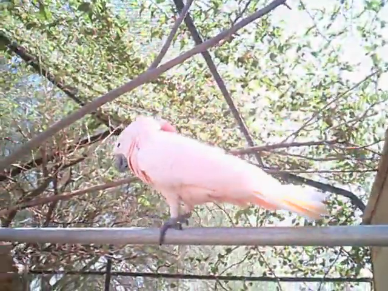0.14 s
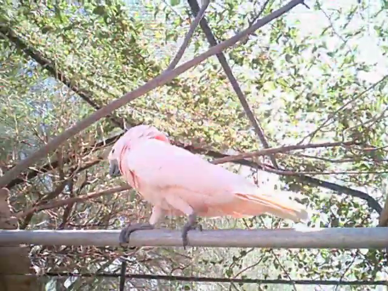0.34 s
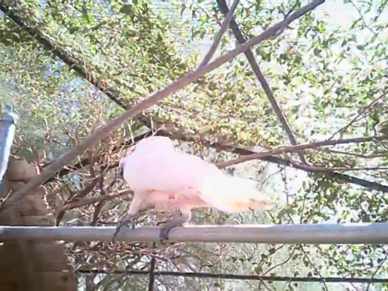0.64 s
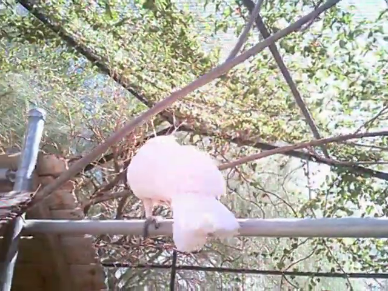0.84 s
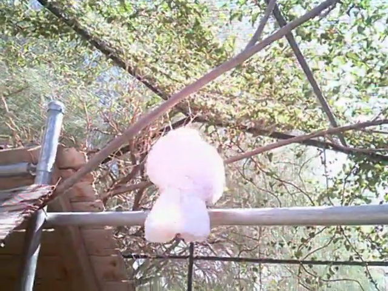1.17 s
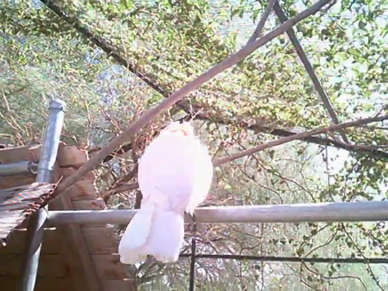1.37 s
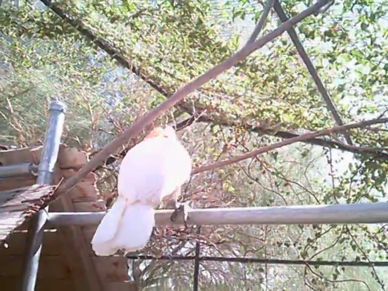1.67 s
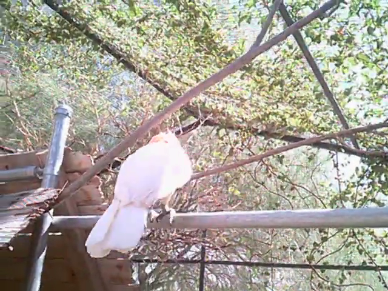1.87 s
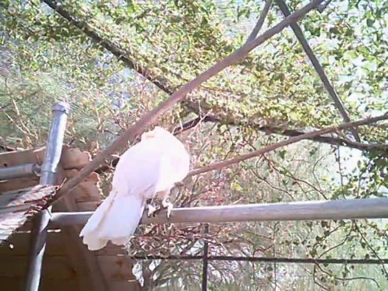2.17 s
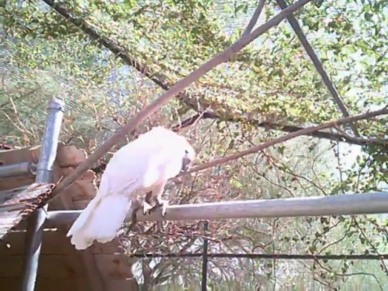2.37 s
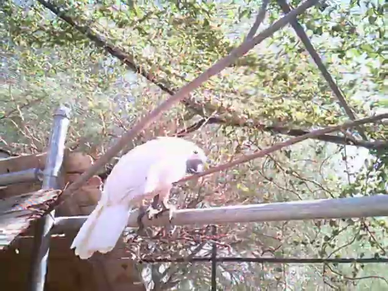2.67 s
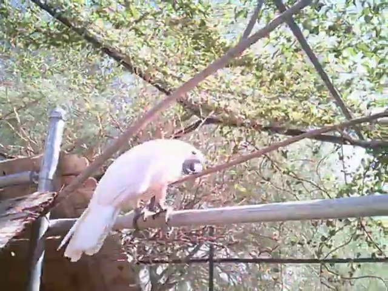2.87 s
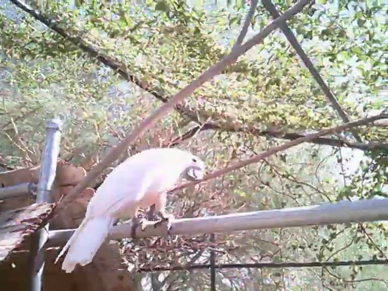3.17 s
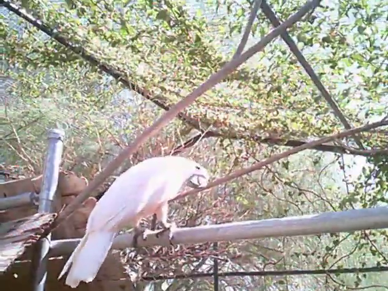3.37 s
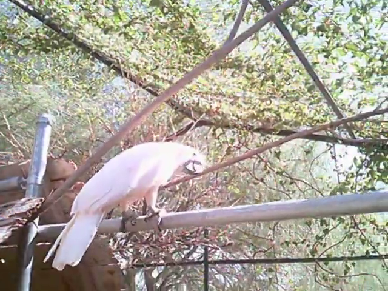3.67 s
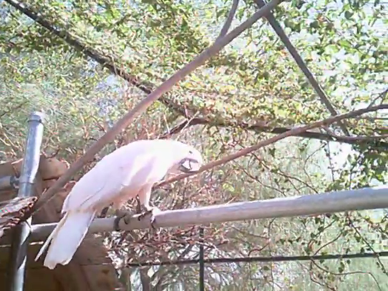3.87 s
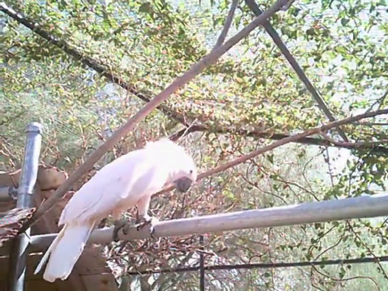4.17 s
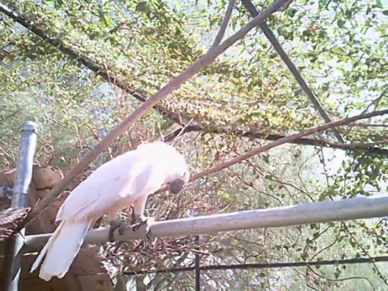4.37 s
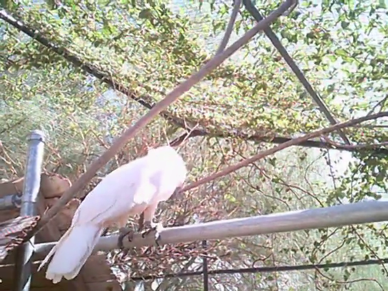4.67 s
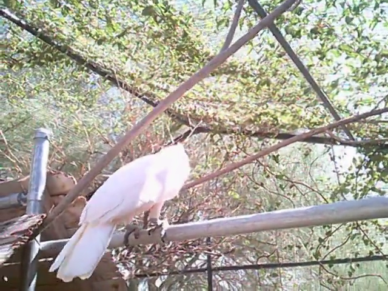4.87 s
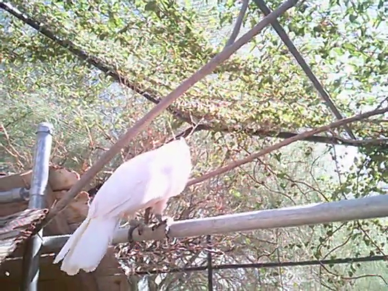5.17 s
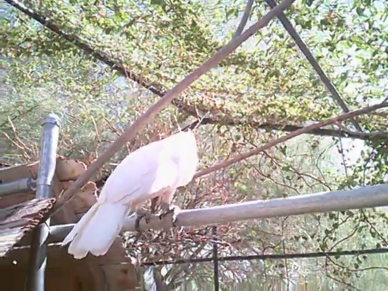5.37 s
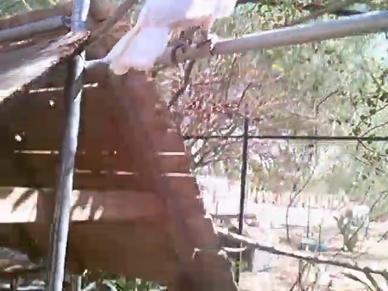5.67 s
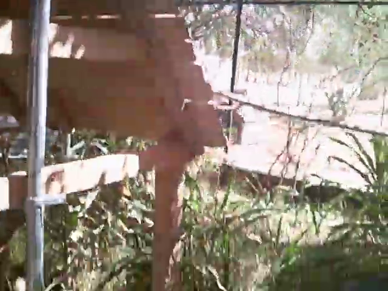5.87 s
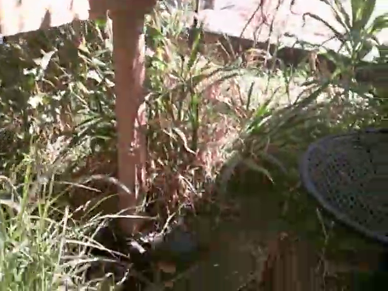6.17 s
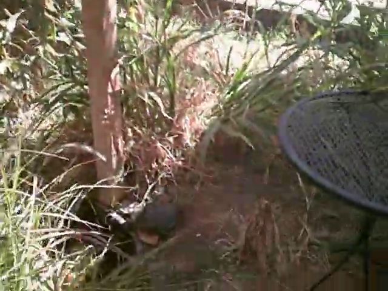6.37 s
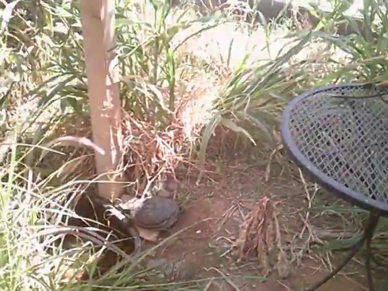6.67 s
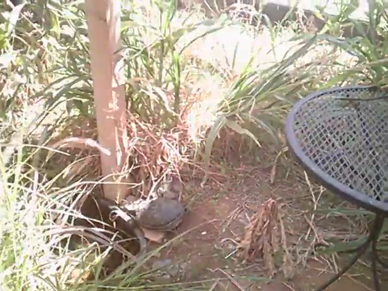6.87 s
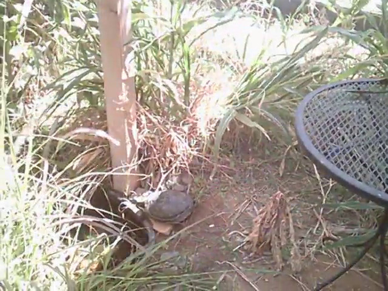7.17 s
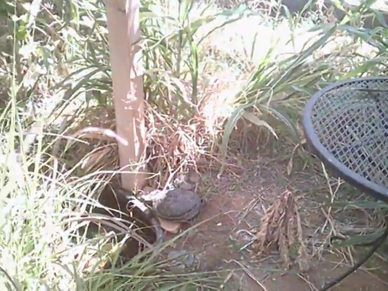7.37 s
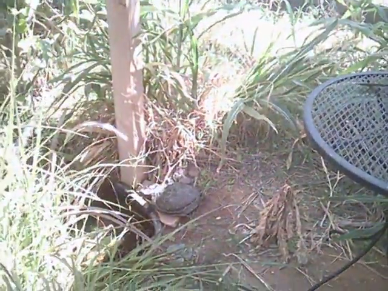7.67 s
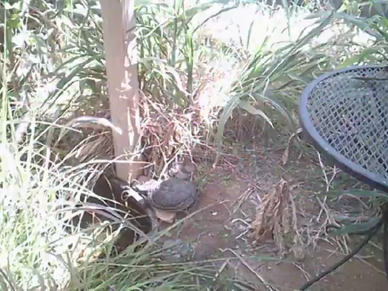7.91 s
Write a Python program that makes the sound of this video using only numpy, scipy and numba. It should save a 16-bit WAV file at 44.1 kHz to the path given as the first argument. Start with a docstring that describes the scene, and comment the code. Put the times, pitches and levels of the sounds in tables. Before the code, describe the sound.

Loud raspy parrot grumbles, about a third of a second each, repeat with pauses in open air; an eighth is cut off just as it starts.

```python
"""Cockatoo grumbling in an aviary

A cockatoo on a perch outdoors gives seven harsh, grumbling calls and starts an eighth. Each scoops
up to a held pitch, flips between rasping and clean vibration, and drops into a short croak: a voice
made of overtones and noise, coloured by throat and beak. A distant motor hums on sine waves. Filtered
noise makes open air, rustling leaves and ticking twigs; short sine waves make faint bird peeps and a knock.
"""
import sys
import numpy as np
from scipy import signal
from scipy.fft import rfft, irfft, next_fast_len
from scipy.io import wavfile
from scipy.ndimage import uniform_filter1d
from numba import njit

SR = 44100
rng = np.random.default_rng(int(sys.argv[2]) if len(sys.argv) > 2 else 0)


def unload_wav(signal):
    """Save mono or channel-first audio to the path in sys.argv[1] as 16-bit WAV at rate SR, clipped to [-1, 1]."""
    wavfile.write(
        sys.argv[1],
        SR,
        np.round(np.clip(np.atleast_2d(signal).T, -1, 1) * 32767).astype(np.int16),
    )


N = 354563
TIME = np.arange(N) / SR

# open air, the balance of its noise: f/Hz, relative level/dB
AIR_BALANCE = [(12, -29.5), (24, -2), (50, -1.5), (85, -8.5), (130, -14), (290, -20.5), (520, -25),
               (820, -21), (1300, -38), (2000, -41), (3200, -34.5), (4300, -56.5), (7000, -47.5),
               (9000, -61)]
# motor, its hum lines: f/Hz, relative level/dB
HUM_LINES = [(58.5, 1.5), (117, -13.5), (175.5, -16.5)]
# motor, loudness over time, before a common trim: t/s, level/dB
HUM_LOUDNESS = [(0, -46.5), (0.5, -37.5), (0.85, -46.5), (1.5, -40.5), (2.1, -40.5), (3.0, -45.5),
                (3.25, -35.5), (3.6, -50.5), (4.4, -43.5), (6.2, -46.5), (6.9, -42.5), (8.04, -44)]
# twig ticks, levels before a common trim and the echo: t/s, peak level/dB, ring f/Hz
TWIG_TICKS = [(0.288, -45.5, 1740), (1.0795, -45, 3200), (3.3617, -50, 3240), (3.497, -44.5, 2390),
              (6.4402, -46, 2000), (7.053, -47, 1890), (7.258, -48, 2700), (7.807, -43, 2190)]
# the calls: start t/s, end t/s, attack t/s, held pitch f/Hz, roughness (0 to 1), opening note level/dB,
# beak resonance f/Hz, then the basic level/dB of the lowest, second, third, upper and treble regions
CALLS = [ (.369, 0.824, 0.039, 422, 0.58, -30, 3050, -26.5, -26.5, -18, -20, -33),
         (1.135, 1.529, 0.028, 409.1, 0.7, -29, 2990, -30, -24.5, -21, -23.5, -38),
         (1.945, 2.309, 0.053, 414, 0.65, -38, 2960, -27.5, -24.5, -20.5, -23.5, -35),
         (2.73, 3.072, 0.038, 419, 0.62, -41, 2750, -23.5, -22, -19.5, -17.5, -29.5),
         (4.372, 4.768, 0.045, 407.1, .8, -28.5, 3050, -26, -27, -21, -19.5, -35.5),
         (5.12, 5.468, 0.044, 401.8, .68, -26.5, 2960, -24.5, -25.5, -21.3, -22.5, -38),
         (5.822, 6.137, 0.039, 398.9, .68, -29.5, 2700, -25, -25.5, -21, -17.5, -35.5),
         (8.017, 8.35, .045, 415.6, 0.8, -28.5, 3030, -24, -16.5, -20.5, -14, -32)]
# stretches where the membranes lock and the tone clears:
# start t/s, end t/s, roughness (0 to 1), ring level/dB, dip of the third region level/dB
CLEAR_STRETCHES = [(0.608, 0.666, .42, 4, 0.5), (1.188, 1.336, .5, 5.5, 6.5), (1.335, 1.386, .15, 5.5, 11),
                   (2.182, 2.26, .1, 0, 0), (2.949, 2.989, 0.39, 2.5, -1), (4.621, 4.677, .06, 3.5, 0.5),
                   (5.267, 5.338, .52, 2, 0.5), (5.991, 6.018, .45, 4, -1.5)]
# surges of pressure in the calls: t/s, half length t/s, pitch rise f/Hz, gain of the third region level/dB
PRESSURE_SURGES = [(0.499, .055, 18, 5.5), (0.712, .04, 14, 2), (1.427, .04, 22, 3), (2.091, .055, 28, 4.5),
                   (2.924, 0.0203, 14.15, -0.5), (4.492, .035, 16, 4.5), (4.584, .025, 18, 2.5),
                   (4.701, .016, 28, -0.5), (5.23, 0.01816, 11.985, 3.5), (5.353, .028, 21, 3),
                   (5.943, 0.01753, 16, -1), (6.046, .018, 27, -6.5)]
# throat resonances: f/Hz, width f/Hz, level/dB
THROAT_RESONANCES = [(878, 210, 6), (1290, 260, 5.5), (1520, 330, -3), (2076, 150, 2), (2340, 420, 1),
                     (2850, 1000, -7.5), (3202, 330, -3), (4490, 380, -17), (5324, 390, -22.5),
                     (6820, 1050, -19.5)]
# borders between the five regions of the throat: f/Hz
REGION_BORDERS = [1030, 1650, 2350, 4000]
# how each region answers the effort: attack depth level/dB, jump at the join level/dB, swell (dB per s),
# push level/dB, release (dB per s), share of a clear stretch's ring (ratio)
REGION_EFFORT = [(3, 1, 5, 7.5, 199, -0.61), (20.1, 2.5, 9.5, 2.5, 123, 1.0), (30, 3, -3, 3.9, 319, 0.1),
                 (41.4, 0.5, 11, 2, 359, -0.16), (41, 1.5, -1, 0.4, 420, 0.25)]
# peeps of birds farther off, before the echo: t/s, f/Hz, peak level/dB
FAR_PEEPS = [(1.81, 1490, -50), (5.078, 3320, -53), (6.59, 1440, -44.5), (6.787, 2450, -48.5),
             (7.513, 1415, -46), (7.679, 2360, -56), (7.865, 2210, -48)]
# one soft knock: t/s, f/Hz, starting level/dB
SOFT_KNOCK = (7.878, 560, -29)

# the scoop and the fall, depths as shares of the pitch
SCOOP_DEPTH, SCOOP_S = 0.43, 0.031
FALL_DEPTH, FALL_S, FALL_CURVE, FALL_ROUGHNESS = 0.61, 0.072, 1.6, 0.9
# the falling voice breaks up this long before the end, over this time
BREAK_LEAD_S, BREAK_S = 0.057, 0.016
LOCK_EDGE_S = 0.012
# the opening note peaks and fades, then the lower membrane joins and the voice jumps in level
NOTE_PEAK_S, NOTE_WIDTH_S, NOTE_DIP_DB = 0.015, 0.0092, 7
JOIN_S, JOIN_RAMP_S = 0.061, 0.0077
# a last push of air comes shortly before the end, and the sound dies from there
PUSH_LEAD_S, PUSH_WIDTH_S = 0.036, 0.015
# a surge roughens the voice and lifts the lower tone onto the lowest resonance
SURGE_ROUGHNESS_PER_HZ, SURGE_DB_PER_HZ = 0.0032, 0.1277


def from_db(db):
    """Turn decibels into a gain."""
    return 10 ** (np.asarray(db) / 20)


def rms_one(x):
    """Scale a sound to an average power of 1."""
    return x / np.sqrt(np.mean(x ** 2) + 1e-20)


def ramp(x):
    """Limit a value to the range from 0 to 1."""
    return np.clip(x, 0, 1)


def hump(t, width_s):
    """A bell of height 1 around time zero."""
    return np.exp(-np.minimum((t / width_s) ** 2, 50))


def butter(x, hz, kind, order=2):
    """A smooth filter that passes one side of a frequency."""
    return signal.sosfilt(signal.butter(order, hz, kind, fs=SR, output="sos"), x)


def drift(rate_hz, size=16):
    """Random wander, mostly slower than the given rate, with a spread of 1."""
    count = next_fast_len(N // size + 2)   # points on a coarse time grid
    hz = np.arange(count // 2 + 1) * SR / size / count
    spectrum = rfft(rng.standard_normal(count)) / (1 + (hz / rate_hz) ** 2)
    slow = irfft(spectrum, count)
    return np.interp(TIME, np.arange(count) * size / SR, rms_one(slow))


def resonate(x, hz, width_hz):
    """A simple resonance: it passes its own pitch at gain 1 and weakens the rest."""
    r = np.exp(-np.pi * width_hz / SR)
    forward = np.array([1, 0, -1]) * (1 - r * r) / 2
    feedback = [1, -2 * r * np.cos(2 * np.pi * hz / SR), r * r]
    return signal.lfilter(forward, feedback, x + 1e-18)


def shaped(x, gain_at):
    """Filter by a gain that depends on frequency."""
    size = next_fast_len(N + SR // 4)
    hz = np.maximum(np.arange(size // 2 + 1) * SR / size, 1)
    return irfft(rfft(x, size) * gain_at(hz), size)[:N]


def even(x, size):
    """Hold the running power at 1 over about this many samples."""
    power = uniform_filter1d(uniform_filter1d(x ** 2, size), size)
    return x / np.sqrt(np.abs(power) + 1e-12)


@njit
def glide(x, angle, r):
    """A resonance whose centre (radians per sample) moves; gain 1 at the centre."""
    y = np.zeros(len(x))
    for i in range(2, len(x)):
        fresh = (1 - r * r) / 2 * (x[i] - x[i - 2])
        y[i] = fresh + 2 * r * np.cos(angle[i]) * y[i - 1] - r * r * y[i - 2]
    return y


def moving_resonance(x, centre_hz, width_hz):
    """The gliding resonance applied twice, for steep sides."""
    angle = 2 * np.pi * centre_hz / SR
    r = np.exp(-np.pi * width_hz / SR)
    return glide(glide(x + 1e-18, angle, r), angle, r)


def air(level_db=-42.5, sway_db=1.9):
    """Soft outdoor noise, heavy in the bass, swaying a little in level."""
    points_hz, points_db = np.transpose(AIR_BALANCE)

    def balance(hz):
        return from_db(np.interp(np.log(hz), np.log(points_hz), points_db))

    noise = rms_one(shaped(rng.standard_normal(N), balance))
    return noise * from_db(level_db + sway_db * drift(rate_hz=7.5))


def motor(waver=0.27, slip=0.9, trim_db=-2.0):
    """A low hum of sine waves that swells and wavers in strength and phase."""
    loudness_db = np.interp(TIME, *np.transpose(HUM_LOUDNESS))
    hum = 0
    for hz, db in HUM_LINES:
        strength = from_db(db + loudness_db + trim_db) * np.sqrt(2) * (1 + waver * drift(rate_hz=2.6))
        hum = hum + strength * np.sin(2 * np.pi * hz * TIME + slip * drift(rate_hz=3))
    return hum


def leaves(level_db=-72, patchy_db=10.5, stir_db=4.0, width_hz=550):
    """Foliage rustles faintly: brief stirs of noise, each with patches of different pitch."""
    rustling = 0
    for hz in 850 * 1.3 ** np.arange(6):
        rustle = resonate(resonate(rng.standard_normal(N), hz, width_hz), hz, width_hz)
        patches = from_db(patchy_db * np.minimum(drift(rate_hz=47), 2.5))
        rustling = rustling + rms_one(rustle * patches)
    return from_db(level_db + stir_db * np.minimum(drift(rate_hz=14), 2.5)) * rustling


def ticks(trim_db=-2, width_hz=1800, scuff_s=0.014, dull_hz=4500):
    """Each twig tick is a brief scuff of noise on a damped piece of wood."""
    out = np.zeros(N)
    age = np.arange(SR // 10) / SR
    for s, db, hz in TWIG_TICKS:
        scuff = rng.standard_normal(len(age)) * np.exp(-age / scuff_s)
        tick = butter(resonate(scuff, hz, width_hz), dull_hz, "low")
        tick = from_db(db + trim_db) * tick / np.abs(tick).max()
        start = int(s * SR)
        out[start:start + len(age)] += tick[:N - start]
    return out


def each_call():
    """Time since the start and until the end of the nearest call, then its other columns."""
    calls = np.array(CALLS)
    turns = (calls[1:, 0] + calls[:-1, 1]) / 2   # halfway through each pause
    start, end, *columns = calls.T[:, np.searchsorted(turns, TIME)]
    return TIME - start, end - TIME, columns


def locks(rough):
    """Roughness, extra ring and dip of the third region as the membranes slip into and out of step."""
    ring_db = dip_db = 0
    for start, end, lock_rough, ring, dip in CLEAR_STRETCHES:
        locked = ramp(0.5 + np.minimum(TIME - start, end - TIME) / LOCK_EDGE_S)
        rough = rough + locked * (lock_rough - rough)
        ring_db = ring_db + locked * ring
        dip_db = dip_db + locked * dip
    return rough, ring_db, dip_db


def surges():
    """Each surge of pressure is a smooth hump in pitch and in the gain of the third region."""
    return sum(np.outer([rise_hz, db], hump(TIME - s, half_s)) for s, half_s, rise_hz, db in PRESSURE_SURGES)


def tension(age, left, held_hz, rough, rise_hz):
    """Pitch and roughness: a scoop, a hold that rides the surges, a speeding fall that breaks up."""
    scoop = 1 - SCOOP_DEPTH * np.exp(-age / SCOOP_S)
    fall = ramp(1 - left / FALL_S) ** FALL_CURVE
    pitch = (held_hz + rise_hz) * scoop * (1 - FALL_DEPTH * fall)
    rough = rough + SURGE_ROUGHNESS_PER_HZ * rise_hz
    broken = ramp((BREAK_LEAD_S - left) / BREAK_S)
    return pitch, rough + broken * (FALL_ROUGHNESS - rough)


def syrinx(pitch, rough, rising, jitter=0.024, slow_jitter=0.01412, shimmer=0.72, scatter=0.82,
           rasp=1.0, hiss=0.053, weak_db=-5.5, weak_scatter=1.1, half_db=-6, flicker_db=4,
           join_hz=390, blur_order=11.5, whisper_db=-12):
    """Two membranes lock at 3 and 2 times the pitch; roughness unsettles their cycles' length, level and shape."""
    fast_wander = jitter * rough * drift(rate_hz=130)
    slow_wander = slow_jitter * rough * drift(rate_hz=44.7)
    phase = 2 * np.pi * np.cumsum(pitch * (1 + fast_wander + slow_wander)) / SR
    phase = phase % (4 * np.pi)   # two cycles, so the half-way lines stay continuous
    # the lower membrane joins in fully only near the top of the scoop
    lower = np.where(rising, np.clip(1 + (pitch - join_hz) / 50, 0.2, 1), 1)
    buzz = 0
    for k in range(2, 20):
        # the two tones and their sums (2, 5, 8, ..) stand out; other overtones are weak and smeared
        strong = k == 3 or k % 3 == 2
        base_db = 0 if strong else weak_db * (k / 6) ** 0.41
        weight = (1 if k == 3 else lower) * from_db(base_db + flicker_db * rough * drift(rate_hz=50))
        flutter = (scatter if strong else weak_scatter) * rough * drift(rate_hz=120)
        # the rougher the voice, the sooner its high overtones dissolve into the rasp
        intact = 1 / (1 + np.square((k * rough / blur_order) ** 2))
        buzz = buzz + weight * intact * np.cos(k * phase + k * k + flutter)
    # rough stretches slip in and out of period doubling: broken lines halfway between the overtones
    for k in range(2, 9):
        slip = np.clip(drift(rate_hz=35), 0, 2) * rough * lower
        buzz = buzz + from_db(half_db) * slip * np.cos((k + 0.5) * phase + 2.6 * drift(rate_hz=43))
    # air escapes in a puff on every opening
    breath = butter(rng.standard_normal(N), 8000, "low")
    puffs = rms_one(breath * (1 + np.cos(phase)))
    # a bright whisper of air stays even when the tone is clean
    whisper = from_db(whisper_db) * butter(puffs, 3200, "high")
    tone = buzz / 2 * (1 + shimmer * rough * drift(rate_hz=160))
    rasping = (hiss + rasp * rough ** 2) * np.sqrt(lower) * puffs
    return tone + rasping + whisper


def throat_gain(hz, leak_db=-36):
    """Steep-sided resonances of the throat; a little low sound leaks past them."""
    power = from_db(leak_db) ** 2 / (1 + (hz / 900) ** 4)
    for centre, width, db in THROAT_RESONANCES:
        power = power + from_db(db) ** 2 / (1 + (2 * (hz - centre) / width) ** 2 / 2) ** 2
    return np.sqrt(power) / np.sqrt(1 + (330 / hz) ** 8)   # weak below 330 Hz


def effort(age, left, attack_s, note_db, held_db, ring_db, rise_hz, third_db):
    """Level of each region in dB: attack, jump, slow swell, last push and release."""
    attack = np.exp(-age / attack_s)
    push = hump(left - PUSH_LEAD_S, PUSH_WIDTH_S)
    dying_s = np.maximum(PUSH_LEAD_S - left, 0)
    past_middle_s = (age - left) / 2
    alone = 1 - ramp((age - JOIN_S) / JOIN_RAMP_S)   # 1 until the lower membrane joins
    levels = []
    for db, (depth_db, jump_db, swell, push_db, release, share) in zip(held_db, REGION_EFFORT):
        beginning_db = -depth_db * attack - jump_db * alone
        ending_db = push_db * push - release * dying_s
        levels.append(db + beginning_db + swell * past_middle_s + ending_db + share * ring_db)
    lowest, second, third, upper, treble = levels
    # the lowest region starts with the opening note
    opening_db = note_db - NOTE_DIP_DB * (1 - hump(age - NOTE_PEAK_S, NOTE_WIDTH_S))
    lowest = alone * opening_db + (1 - alone) * (lowest + SURGE_DB_PER_HZ * rise_hz)
    return lowest, second, third + third_db, upper, treble


def cockatoo(edge_s=0.0052, croak_width_hz=450, croak_db=-0.5, slack_below_hz=390,
             beak_width_hz=520, beak_db=-1, hop_db=2.0):
    """The syrinx sounds through the throat; the beak shifts the weight between its resonances."""
    age, left, (attack_s, held_hz, rough, note_db, beak_hz, *held_db) = each_call()
    sounding = ramp(1 + np.minimum(age, left) / edge_s)
    rising = age < left   # first half of the call
    age, left = np.maximum(age, 0), np.maximum(left, 0)
    rough, ring_db, dip_db = locks(rough)
    rise_hz, surge_db = surges()
    pitch, rough = tension(age, left, held_hz, rough, rise_hz)
    source = syrinx(pitch, np.clip(rough, 0, 1.2), rising)
    # as the pitch collapses the throat goes slack and its lowest resonance sinks with the lower membrane
    slack = ramp((slack_below_hz - pitch) / 90) * ~rising
    croak = moving_resonance(source * slack, 2 * pitch, croak_width_hz)
    voice = shaped(source, throat_gain) + from_db(croak_db) * croak
    voice = voice + from_db(beak_db) * moving_resonance(voice, beak_hz, beak_width_hz)
    # split the voice into regions by subtracting what lies below each border
    below = [0]
    for edge in REGION_BORDERS:
        below.append(shaped(voice, lambda hz: 1 / (1 + (hz / edge) ** 20)))
    below.append(voice)
    levels_db = effort(age, left, attack_s, note_db, held_db, ring_db, rise_hz, surge_db - dip_db)
    gains = [from_db(db) for db in levels_db]
    # each region is evened out, then follows the effort; in rough stretches the energy hops about
    mixed = 0
    for k, gain in enumerate(gains):
        region = even(below[k + 1] - below[k], size=700)
        mixed = mixed + gain * region * from_db(hop_db * rough * drift(rate_hz=20))
    # air pressure limits the swing: the colour may jump from cycle to cycle, but the power holds
    return even(mixed, size=180) * np.sqrt(sum(gain ** 2 for gain in gains)) * sounding


def peeps(length_s=0.004):
    """Short single notes of other birds: sine waves made slightly husky by a wandering phase."""
    husk = 0.32 * drift(rate_hz=120)
    out = 0
    for s, hz, db in FAR_PEEPS:
        out = out + from_db(db) * hump(TIME - s, length_s) * np.sin(2 * np.pi * hz * TIME + husk)
    return out


def knock(decay_s=0.0017):
    """A dull bump: a sine wave that dies within a cycle or two."""
    s, hz, db = SOFT_KNOCK
    age = np.clip(TIME - s, 0, 0.1)
    return from_db(db) * np.exp(-age / decay_s) * np.sin(2 * np.pi * hz * age)


def aviary(x, near_db=-7, near_t60=0.14, far_db=-26, far_t60=0.49):
    """Quick reflections from shelter and ground, then a faint, duller tail from the yard."""
    age = np.arange(int(0.7 * SR)) / SR

    def fading_noise(t60):   # t60: seconds to fade by 60 dB
        noise = rng.standard_normal(len(age)) * from_db(-60 * age / t60) * (age > 0.004)
        return noise / np.linalg.norm(noise)

    near = from_db(near_db) * fading_noise(near_t60)
    far = from_db(far_db) * butter(fading_noise(far_t60), 4500, "low")
    return x + signal.fftconvolve(x, near + far)[:N]


def scene():
    """Birds and twigs echo in the aviary; knock, leaves, hum and open air are added without echo."""
    echoing = aviary(cockatoo() + ticks() + peeps())
    return (echoing + knock() + leaves() + motor() + air())[None]


def record(dry, band_edge_hz=8300, clip_level=0.71, cutoff_hz=15800):
    """A narrow-band microphone path whose highest peaks clip, then a steep treble cut."""
    narrow = signal.sosfilt(signal.cheby1(8, 0.2, band_edge_hz, fs=SR, output="sos"), dry)
    clipped = np.clip(narrow, -clip_level, clip_level)
    return signal.sosfilt(signal.cheby2(12, 70, cutoff_hz, fs=SR, output="sos"), clipped)


dry = scene()
out = record(dry)
unload_wav(out)
```